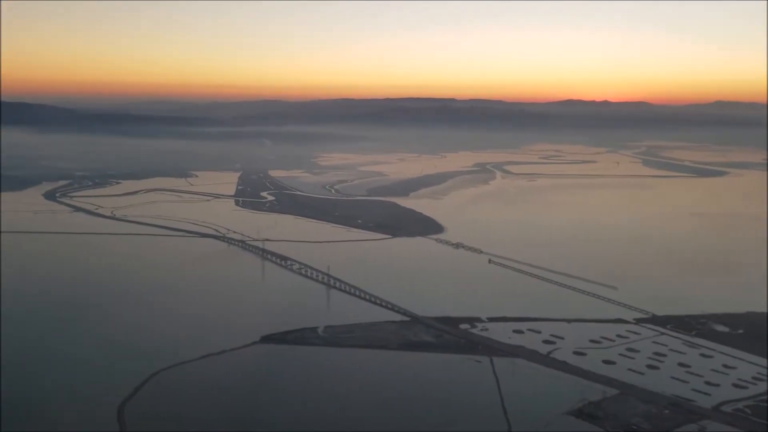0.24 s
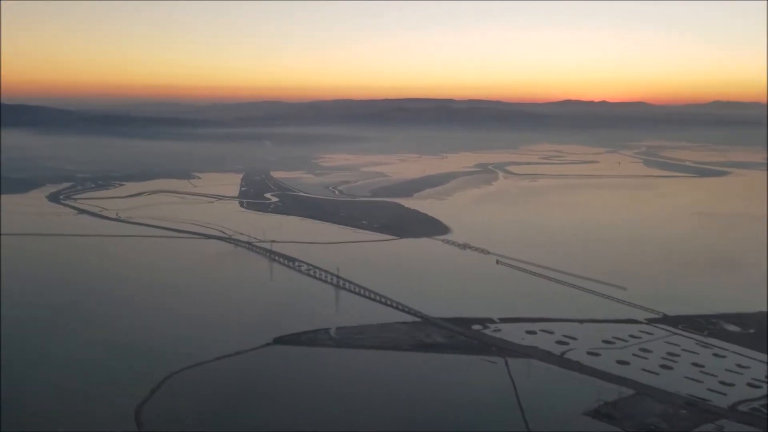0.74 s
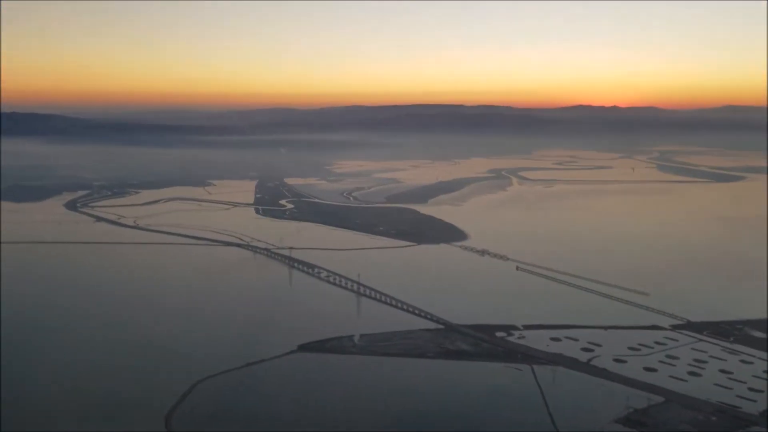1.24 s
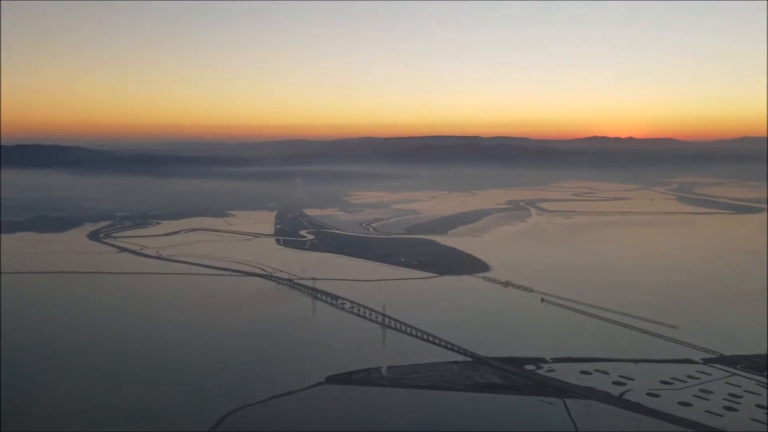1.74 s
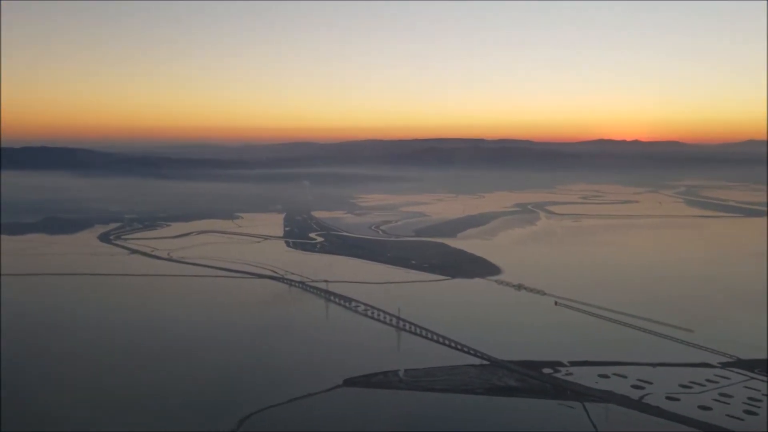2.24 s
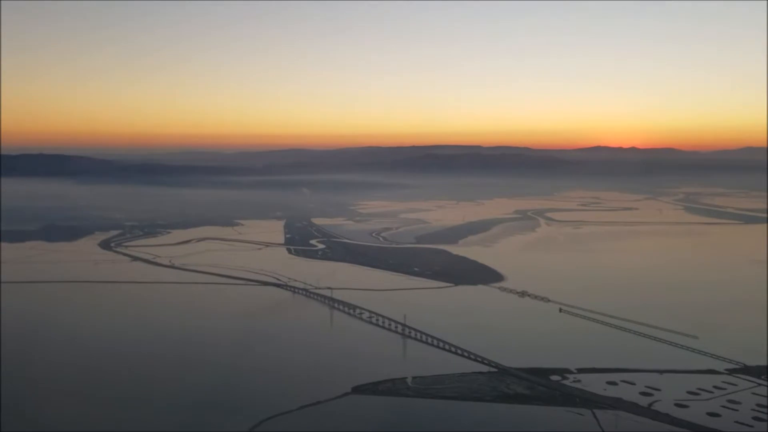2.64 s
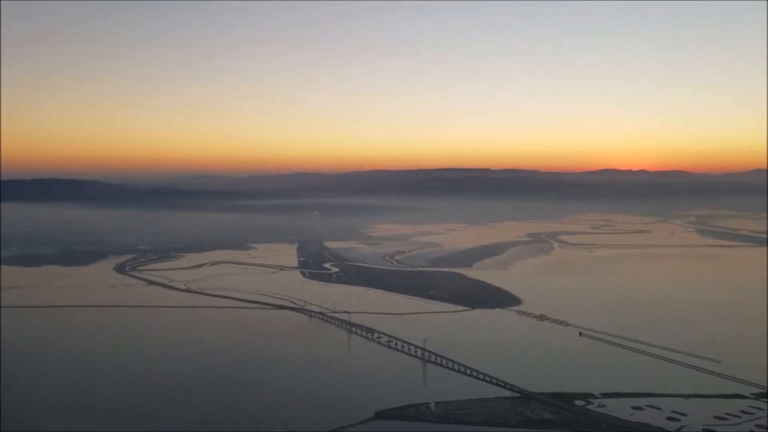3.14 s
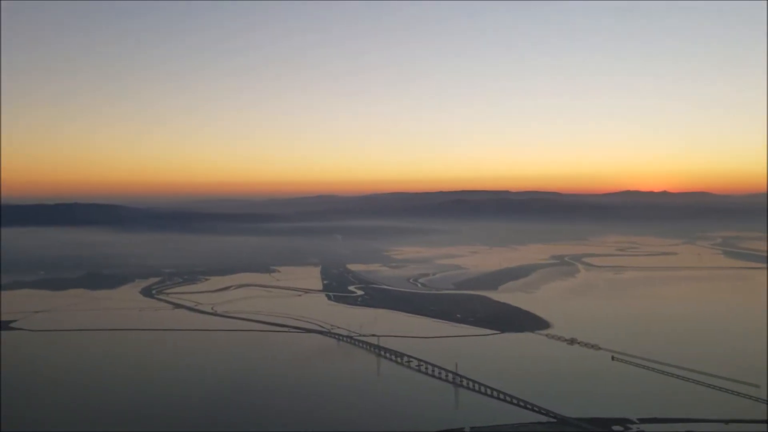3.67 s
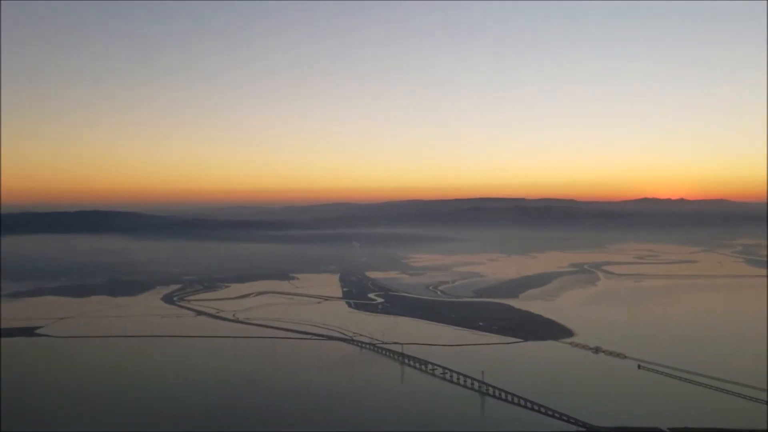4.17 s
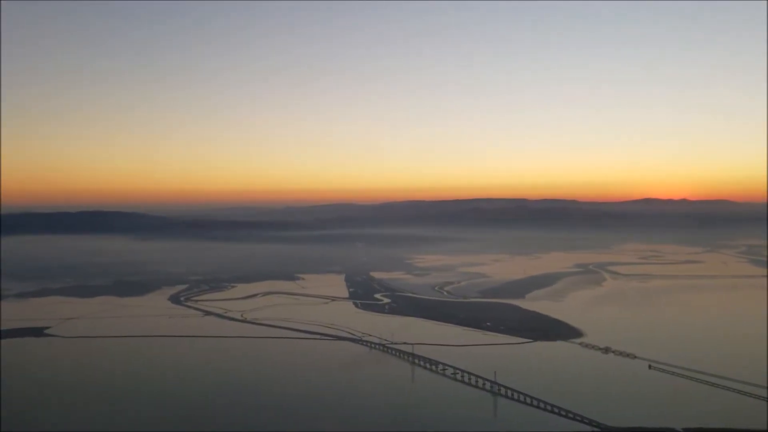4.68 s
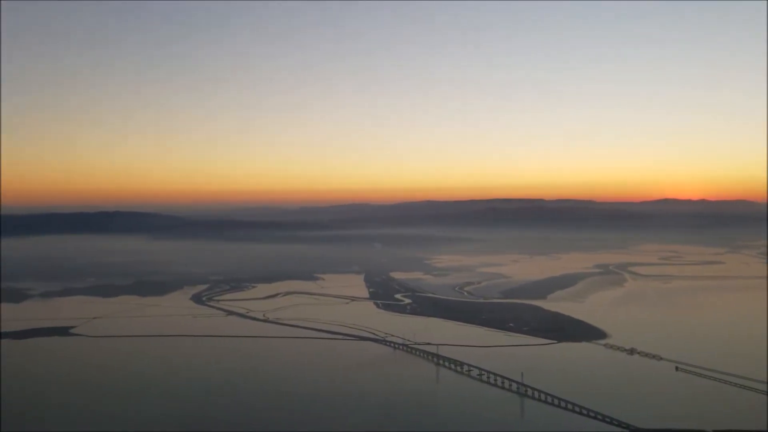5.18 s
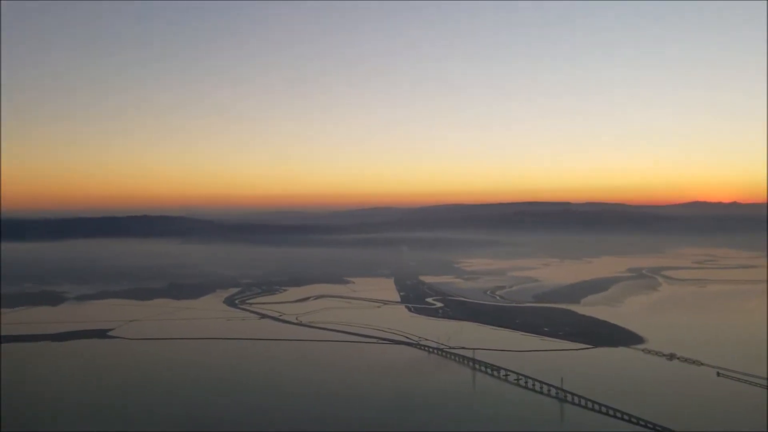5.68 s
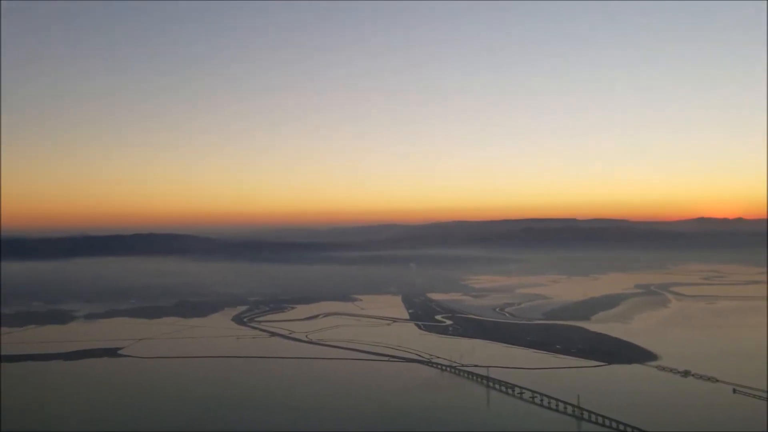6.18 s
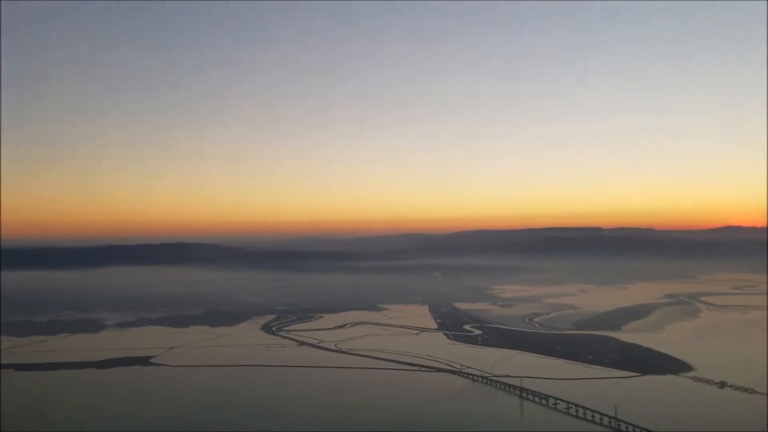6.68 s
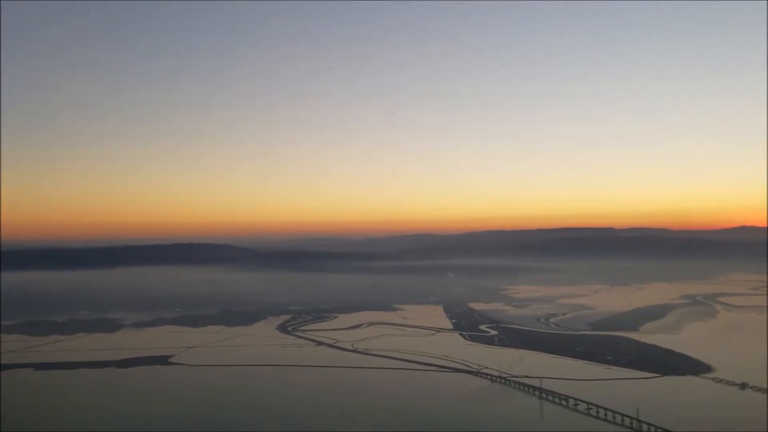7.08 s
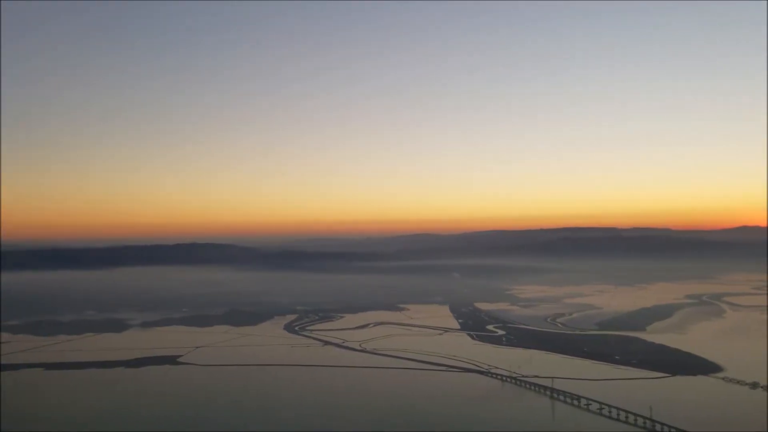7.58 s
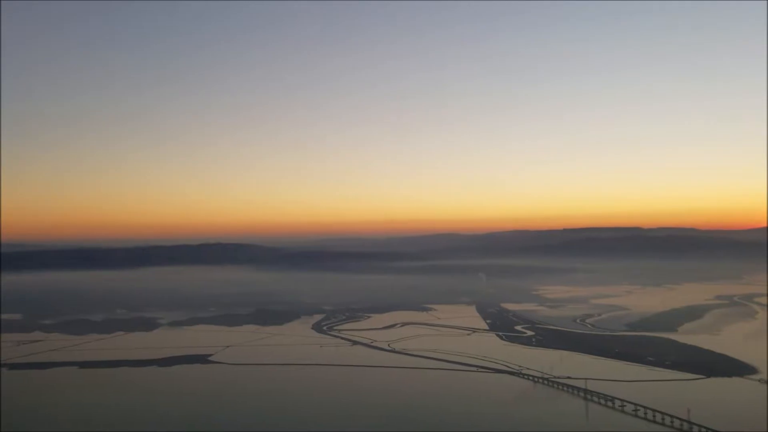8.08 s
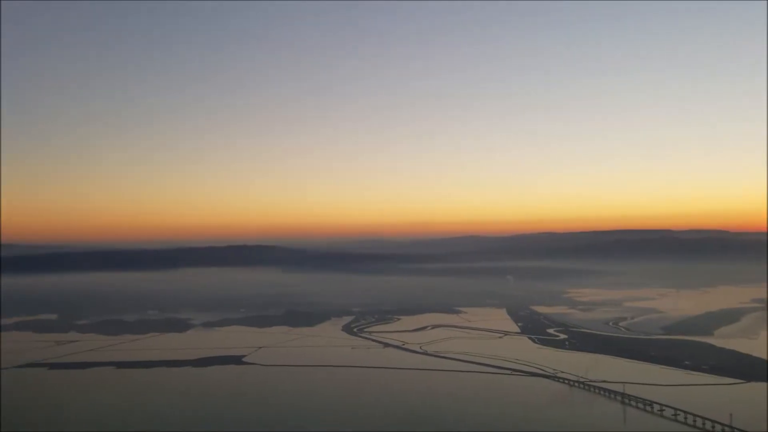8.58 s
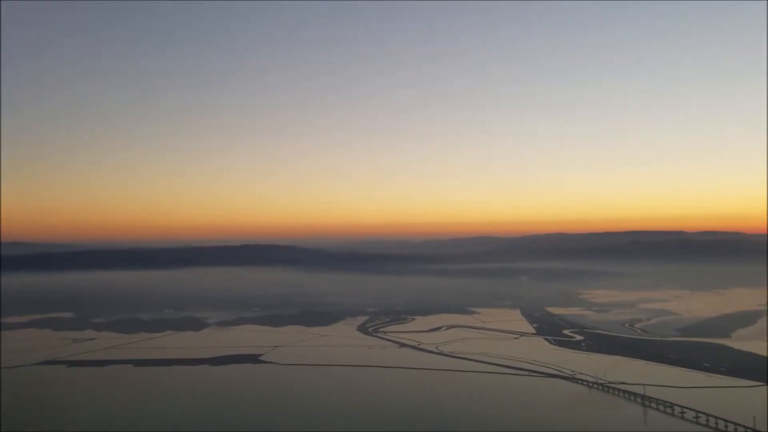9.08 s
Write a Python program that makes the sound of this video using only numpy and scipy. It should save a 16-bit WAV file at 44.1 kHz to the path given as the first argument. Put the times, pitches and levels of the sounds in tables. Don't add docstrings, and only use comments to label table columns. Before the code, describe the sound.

Deep, throbbing low drone inside an airliner cabin in flight, swelling and collapsing irregularly over steady rumble, soft airflow rush and faint hiss.

```python
import sys
import numpy as np
from scipy import signal
from scipy.fft import rfft, irfft, next_fast_len
from scipy.io import wavfile
from scipy.ndimage import uniform_filter1d, minimum_filter1d, map_coordinates

SR = 44100
rng = np.random.default_rng(int(sys.argv[2]) if len(sys.argv) > 2 else 0)


def voltage_ratio(decibels):
    exponent = np.asarray(decibels, float) / 20
    return 10 ** exponent


def bounce(signal):
    frames = np.transpose(np.atleast_2d(signal))
    limited = np.clip(frames, -1, 1)
    pcm = np.round(limited * 32767).astype(np.int16)
    wavfile.write(sys.argv[1], SR, pcm)


N = 411012


def along(points, hz):
    point_hz, value = np.transpose(points)
    return np.interp(np.log(hz + 1), np.log(point_hz + 1), value)


def curves(rows):
    time_s, *columns = np.transpose(rows)
    return [np.interp(np.arange(N) / SR, time_s, column) for column in columns]


def wobble(rate):
    knots = rng.standard_normal(int(N * rate / SR) + 4)
    return map_coordinates(knots, [np.arange(N) * rate / SR])


def swells(rows):
    peak_s, peak_db, length_s = np.transpose(rows)[:3, :, None]
    time_s = np.arange(N * 1000 // SR + 1) / 1000
    return voltage_ratio(peak_db) * .5 ** (2 * (time_s - peak_s) / length_s) ** 2


def spread(slow):
    return np.interp(np.arange(N) / SR * 1000, np.arange(len(slow)), slow)


def modes(table):
    def gain(f):
        return np.sqrt(sum((voltage_ratio(db) / (1 + (2 * (f - hz) / width) ** 2)) ** 2 for hz, width, db in table))
    return gain


def smooth(points):
    return lambda f: voltage_ratio(along(points, f))


def field(gain):
    # hz, left_right_db
    port_shade = [(125, 0), (310, -2), (400, -4.5), (540, -7.5), (700, -0.5), (880, 4.5), (1300, 1),
                  (2000, 1.5), (2700, 2.5), (3350, 4), (3750, 3), (4600, 2), (7000, -0.5), (15000, 0)]
    # hz, correlation (-1 to 1)
    likeness = [(60, .997), (125, 0.98), (300, .99), (430, 0.89), (540, 0.33), (700, -0.5), (900, 0.14),
                (1150, 0.38), (1500, -0.54), (2000, 0.55), (3000, 0.06), (7000, -.1), (15000, -0.2)]
    m = next_fast_len(N + 8192)
    hz = np.fft.rfftfreq(m, 1 / SR)
    a, b = rfft(rng.standard_normal((2, m))) * gain(hz)
    turn = np.arccos(np.clip(along(likeness, hz), -1, 1)) / 2
    shade = voltage_ratio(along(port_shade, hz) / 2)
    mid, side = np.cos(turn) * a, np.sin(turn) * b
    pair = irfft([(mid + side) * shade, (mid - side) / shade], m)[:, :N]
    return pair / np.std(pair.mean(0))


def surging(gain, level_db, span_s):
    pair = field(gain)
    power = uniform_filter1d(pair.mean(0) ** 2, size=int(span_s * SR))
    swell = np.sqrt(np.abs(power) + 0.014)
    return voltage_ratio(level_db) * pair / swell


def tone(hz, blur_hz):
    return np.sqrt(2) * np.sin(2 * np.pi * np.cumsum(hz + blur_hz * wobble(14)) / SR)


def boom():
    # start_s (of the peak), level_db, length_s, pitch_hz
    surges = [(0.133, -16.5, 0.27, 127.3), (0.429, -7.5, 0.099, 129.2), (0.879, -21, 0.37, 126.7),
              (1.423, -20, 0.29, 128.4), (1.778, -13, 0.1, 126.7), (2.297, -14.5, 0.1, 124.2),
              (2.63, -16.5, 0.44, 127.4), (3.088, -5, 0.19, 127.3), (3.668, -6.5, 0.083, 127.6),
              (3.957, -9.0, 0.047, 125.7), (4.17, -11, 0.2, 129.9), (4.661, -12.5, 0.057, 134.6),
              (4.922, -17.0, 0.078, 125.5), (5.091, -11, 0.037, 129.6), (5.2, -11, 0.089, 125.5),
              (5.438, -11, 0.037, 129.3), (5.686, -10, 0.07, 121.6), (5.873, -8, 0.047, 129.2),
              (6.103, -1.5, 0.064, 125.6), (6.249, -17, 0.05, 125.7), (6.424, -14, 0.13, 126.8),
              (6.996, -10, 0.13, 124), (7.289, -17.5, 0.032, 129.2), (7.412, -8, 0.079, 127.5),
              (7.565, -10, 0.07, 128.1), (7.697, -3, 0.053, 127), (8.092, -19, 0.062, 125.9),
              (8.297, -10.5, 0.11, 125.8), (8.66, -15.5, 0.28, 129.7), (9.047, -5, 0.16, 126.3)]
    rest_db, rest_hz = -18.5, 127.5
    bells = swells(surges)
    rest = voltage_ratio(rest_db + 3.21 * wobble(6))
    swell = rest + spread(bells.sum(0))
    pull = spread(np.transpose(surges)[-1] @ bells)
    hz = (rest * (rest_hz + 2.39 * wobble(5)) + pull) / swell
    beads = swell * (1 + 0.29 * wobble(17))
    size = .6 * np.tanh(beads / .6)
    weak = 1 / (1 + (size / 0.1165) ** 2)
    return size * tone(hz, blur_hz=0.59 + 9 * weak) * voltage_ratio([[.3], [-.3]])


def shell():
    # pitch_hz, width_hz, level_db
    frame_modes = [(88.5, 38, -10), (111.6, 24, 1.5), (138.5, 30, 4.5), (169.5, 24, -2.5),
                   (206.9, 34, -4.5), (244.7, 32, -6.5)]
    # pitch_hz, width_hz, level_db
    wall_modes = [(276.7, 18.4, 1), (297.3, 18.2, 1.5), (329.7, 28.8, 1), (396, 52, -15.5),
                  (452, 70, -19.5)]
    # pitch_hz, width_hz, level_db
    lowest_modes = [(50.5, 11, 0), (42, 12, -8), (66, 15, -13.5)]
    # time_s, level_db
    roar = [(0, -18), (.6, -18), (.85, -15.5), (1.4, -16), (1.85, -14), (2.15, -17), (2.45, -14),
            (3.1, -16.5), (4, -17), (5, -17), (5.3, -20.5), (5.6, -16), (6.1, -17), (7, -16), (8, -17.5),
            (8.4, -15), (8.8, -16), (9.3, -16)]
    # start_s (of the peak), level_db, length_s
    gust_rows = [(.3, -28.5, 0.15), (.72, -31, 0.21), (1.5, -29, 1), (2.7, -28.5, .6), (3.5, -24, 0.28),
                 (3.95, -22.5, 0.19), (4.4, -25, 0.19), (4.85, -27.5, 0.38), (5.67, -23, 0.21),
                 (6.7, -32.5, 0.24), (7.2, -28, 0.23), (7.6, -31.5, .15), (8.25, -26, 0.4),
                 (8.8, -27, 0.23)]
    # start_s (of the peak), level_db, length_s
    heave_rows = [(0.88, -29, 0.11), (1.7, -40.5, 0.85), (2.66, -38.5, 0.33), (3.01, -28.5, 0.18),
                  (3.29, -28.5, 0.1), (4.27, -23, 0.11), (4.62, -33, 0.28), (5.09, -29.5, 0.14),
                  (5.44, -29, 0.098), (6.2, -39, 0.071), (6.98, -39, 0.71), (7.37, -31.5, 0.063),
                  (8.56, -36.5, 0.75), (9.44, -38.5, 1)]
    frame_db, wall_rest_db, heave_rest_db = 1, -23, -33
    frames = surging(modes(frame_modes), curves(roar)[0] + frame_db, span_s=.2)
    gusts = voltage_ratio(wall_rest_db) + spread(swells(gust_rows).sum(0))
    heave = voltage_ratio(heave_rest_db) + spread(swells(heave_rows).sum(0))
    wall = gusts * surging(modes(wall_modes), 0.1, span_s=0.27)
    air = heave * surging(modes(lowest_modes), 0.11, span_s=.2)
    return frames + wall + air


def shafts():
    # pitch_hz, level_db, blur_hz, left_right_db
    hum_lines = [(309.9, -26.5, 1.497, -1.5), (886, -56, 1.8, 0)]
    hum = 0
    for hz, db, blur_hz, pan_db in hum_lines:
        level = voltage_ratio(db + 2.0 * wobble(2.8))
        hum = hum + level * tone(hz, blur_hz) * voltage_ratio([[pan_db / 2], [-pan_db / 2]])
    return hum


def airflow():
    # hz, level_db (per Hz)
    rush_spectrum = [(250, -60), (380, -1), (550, -8), (700, -8), (870, -12), (1060, -15), (1490, -15),
                     (2200, -18.5), (3300, -22), (3620, -26), (5000, -29), (7000, -40), (9000, -59.5),
                     (15000, -120)]
    # pitch_hz, width_hz, level_db
    panel_modes = [(761, 44, 0.5), (869, 130, -1), (1944, 69, -1), (2058, 65, -0.5), (2200, 90, -13.5),
                   (2710, 110, -20), (3476, 150, -12), (3820, 200, -13), (4400, 90, -21.5),
                   (5470, 500, -28)]
    # hz, level_db (per Hz)
    vent_spectrum = [(2900, -41), (5000, -2), (7400, -3), (11000, -3), (12300, -1.5), (13000, -4),
                     (14000, -5.5), (15700, -3), (17000, -5)]
    flow_db, vent_db = -41, -15.5
    turn_s, turn_length_s, vent_loss_db = 5.95, .3, 2.5
    turned = np.clip((np.arange(N) / SR - turn_s) / turn_length_s + .5, 0, 1)
    rush = voltage_ratio(4.0) * field(smooth(rush_spectrum)) + voltage_ratio(-5.0) * field(modes(panel_modes))
    flutter_db = 0.4 + .4 * wobble(8.6) + .4 * wobble(22)
    hiss = voltage_ratio(vent_db - vent_loss_db * turned + flutter_db) * field(smooth(vent_spectrum))
    return voltage_ratio(flow_db + 0.18 * wobble(5)) * (rush + hiss)


def scene():
    return boom() + shell() + shafts() + airflow()


def roll_off(x):
    return signal.sosfilt(signal.butter(12, 15660, fs=SR, output="sos"), x)


def record(dry):
    # start_s, loss_db
    ducks = [(.38, 0), (2.3, 0), (3.1, 0.5), (3.66, 2), (4.2, 0.8), (5.1, 0.5), (5.88, .8), (6.09, 1),
             (6.849, 1.34), (7.7, 0.1), (9.05, 1)]
    sink_s, recover_s = 0.047, 0.38
    heard = signal.sosfilt(signal.butter(2, 38, "high", fs=SR, output="sos"), dry)
    loss_db = np.zeros(N)
    for start_s, duck_db in ducks:
        since_s = np.maximum(np.arange(N) / SR - start_s, 0)
        loss_db += duck_db * np.minimum(since_s / sink_s, 1) * np.exp(-since_s / recover_s)
    heard = heard * voltage_ratio(-loss_db)
    need = np.minimum(1, .99 / (np.abs(heard).max(0) + 1e-9))
    hold = int(.03 * SR)
    gain = uniform_filter1d(minimum_filter1d(need, size=hold), size=hold // 2)
    return roll_off(heard * gain)


dry = scene()
out = record(dry)
bounce(out)
```